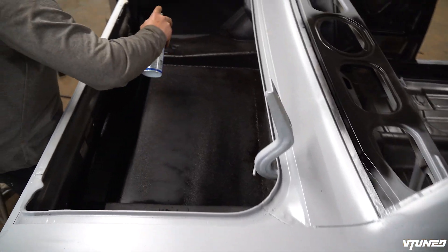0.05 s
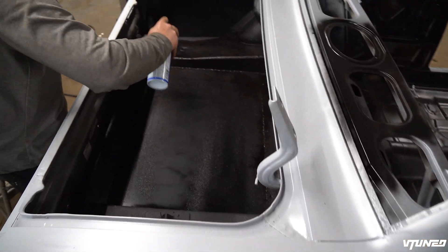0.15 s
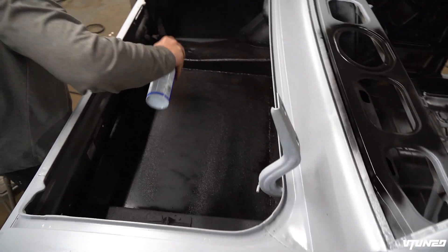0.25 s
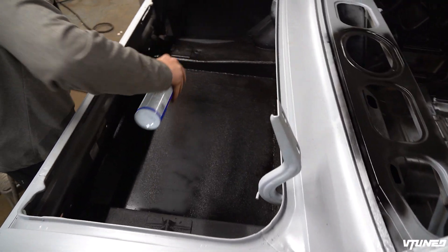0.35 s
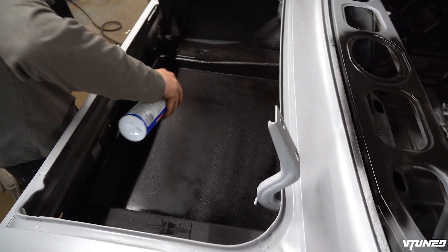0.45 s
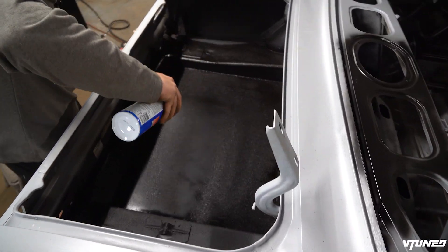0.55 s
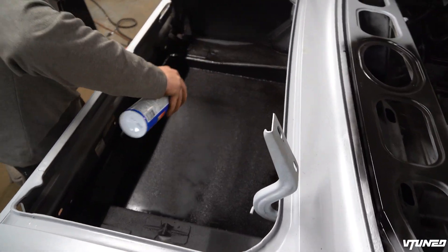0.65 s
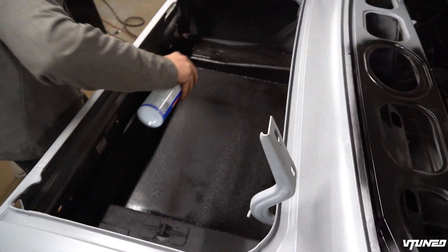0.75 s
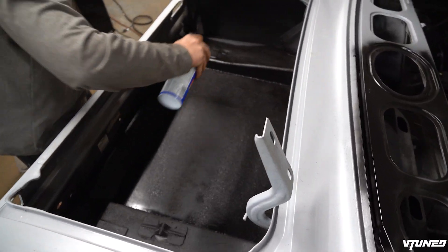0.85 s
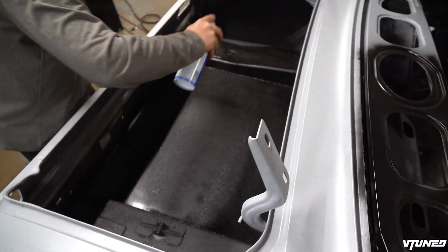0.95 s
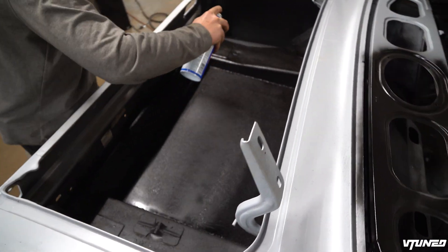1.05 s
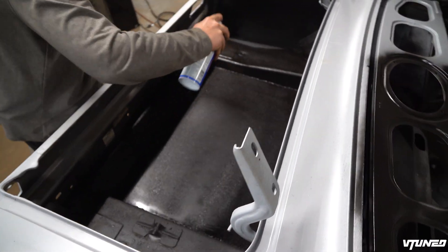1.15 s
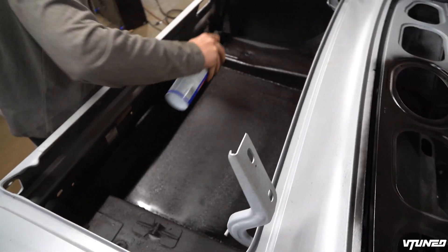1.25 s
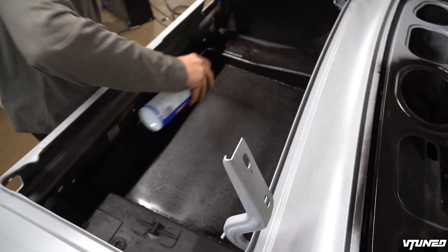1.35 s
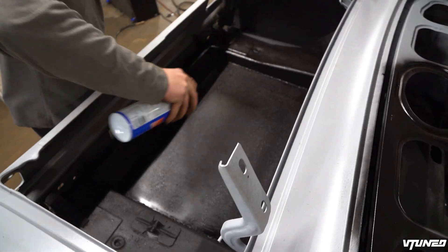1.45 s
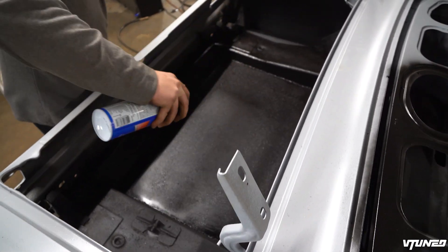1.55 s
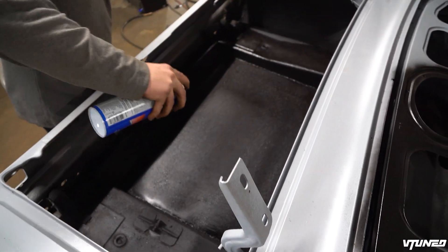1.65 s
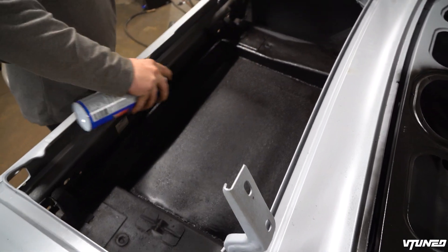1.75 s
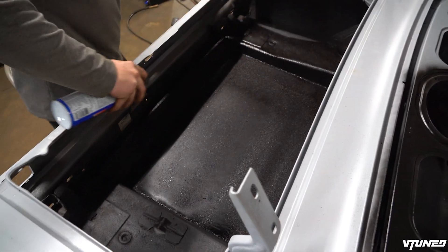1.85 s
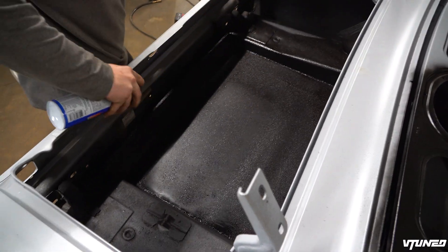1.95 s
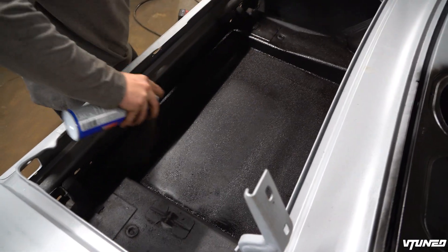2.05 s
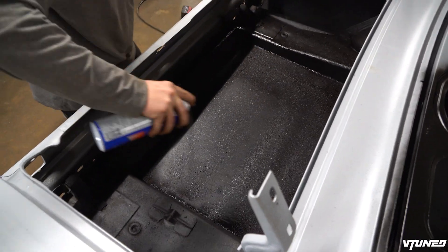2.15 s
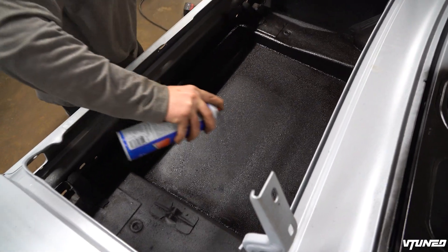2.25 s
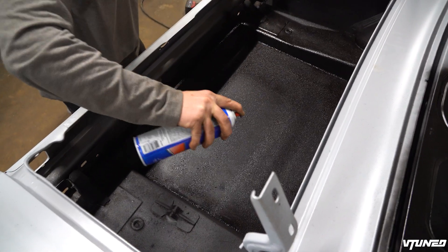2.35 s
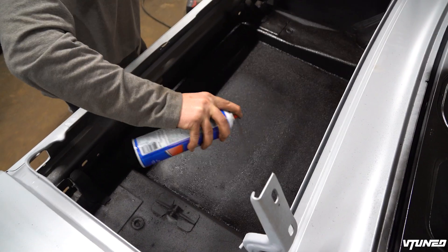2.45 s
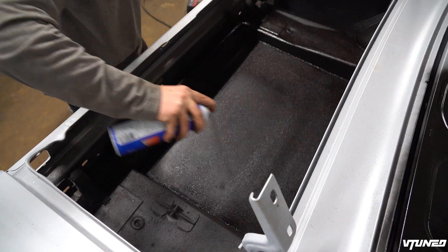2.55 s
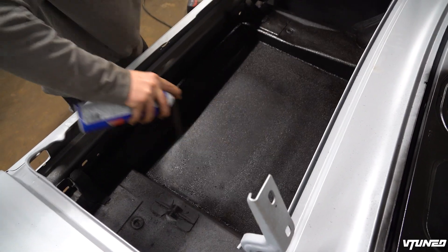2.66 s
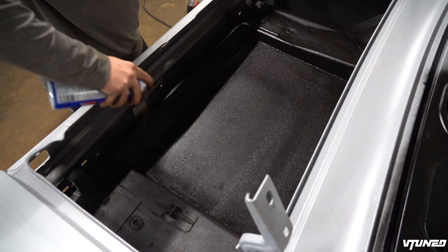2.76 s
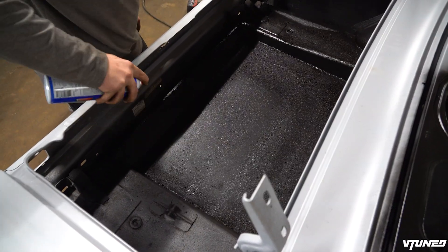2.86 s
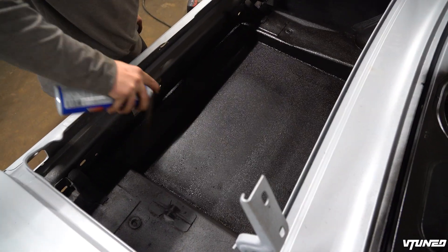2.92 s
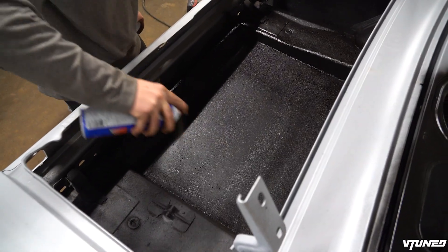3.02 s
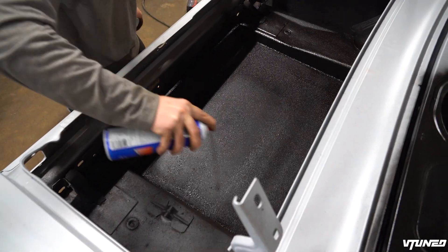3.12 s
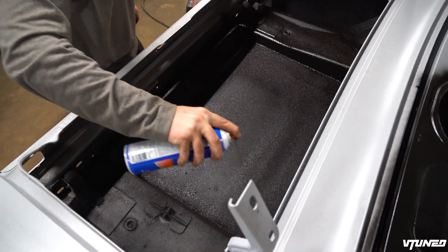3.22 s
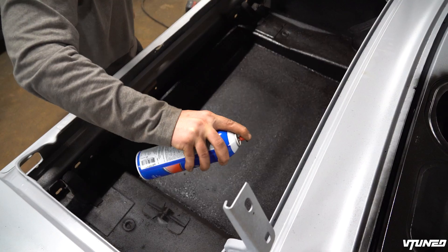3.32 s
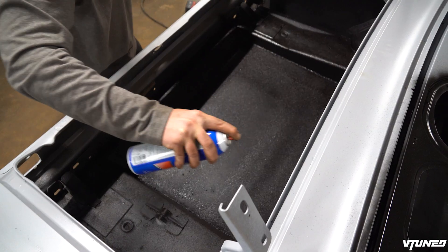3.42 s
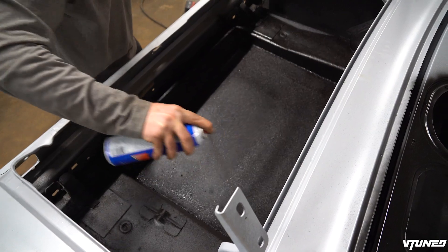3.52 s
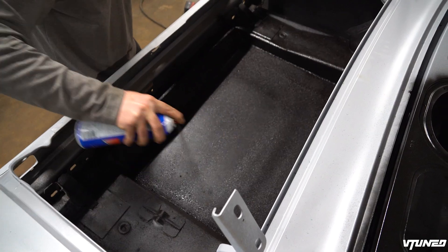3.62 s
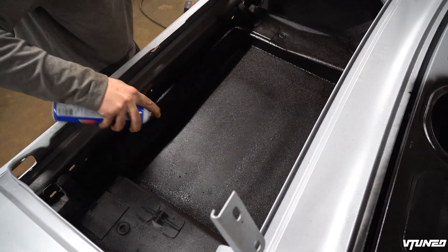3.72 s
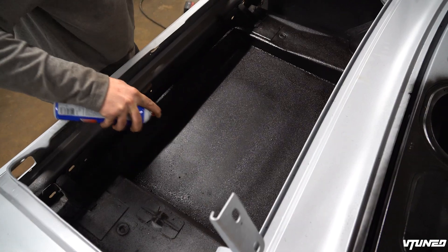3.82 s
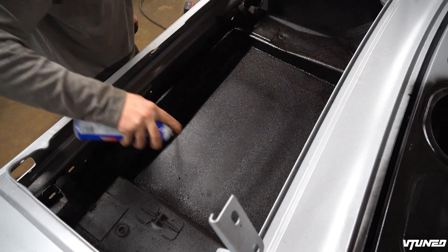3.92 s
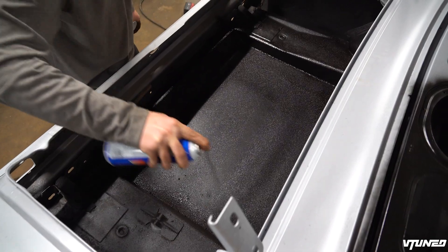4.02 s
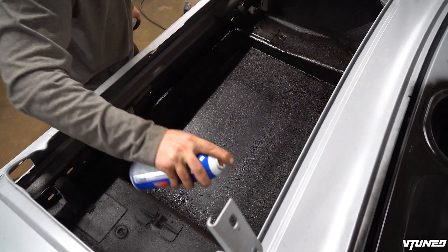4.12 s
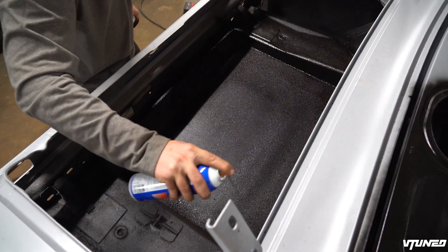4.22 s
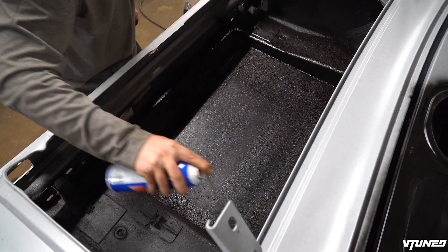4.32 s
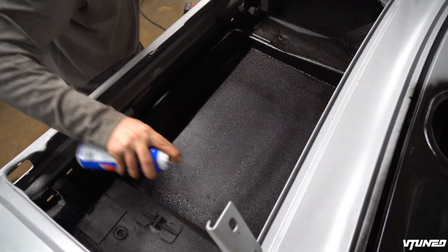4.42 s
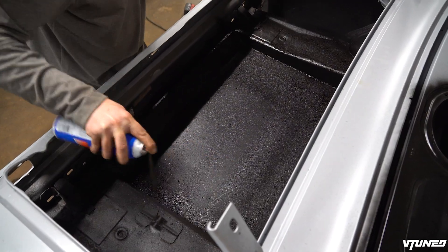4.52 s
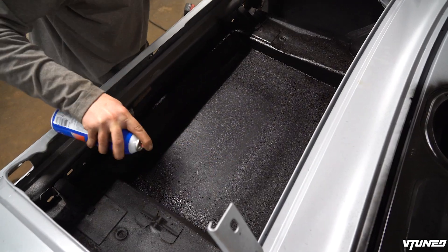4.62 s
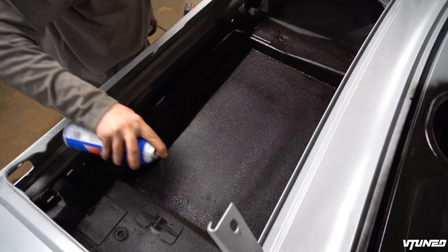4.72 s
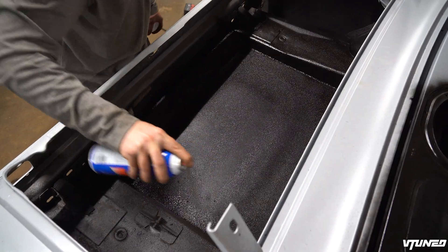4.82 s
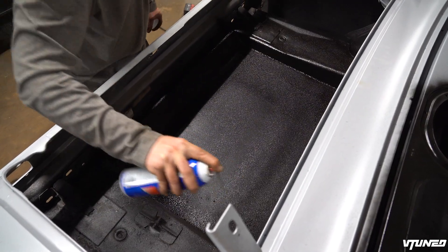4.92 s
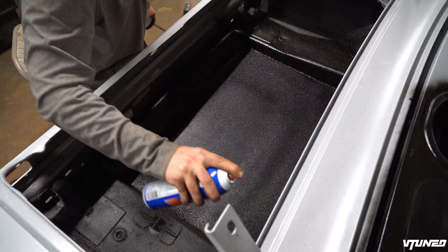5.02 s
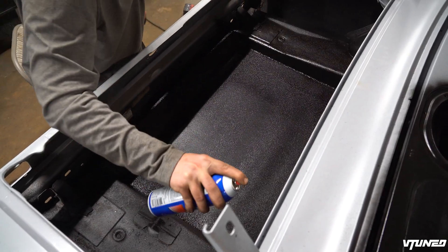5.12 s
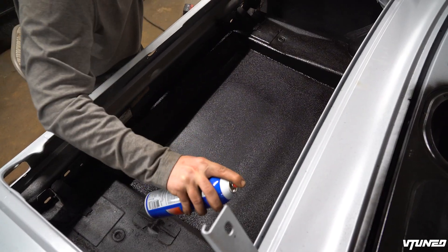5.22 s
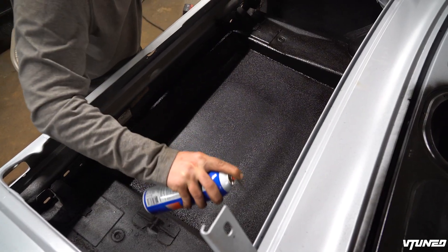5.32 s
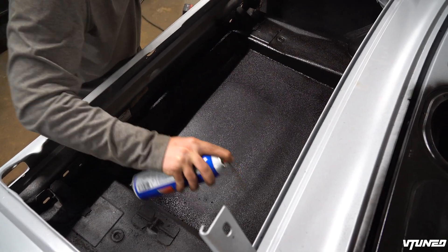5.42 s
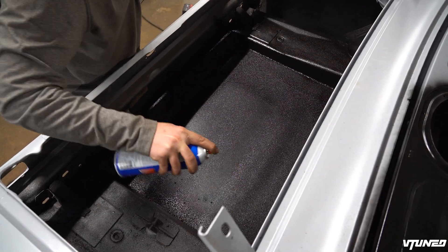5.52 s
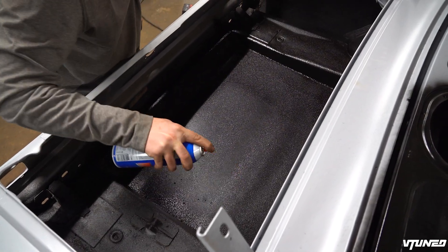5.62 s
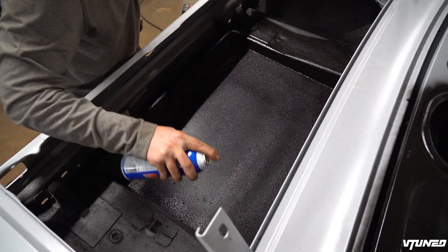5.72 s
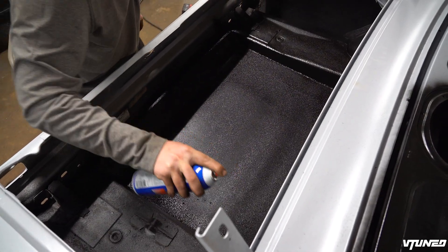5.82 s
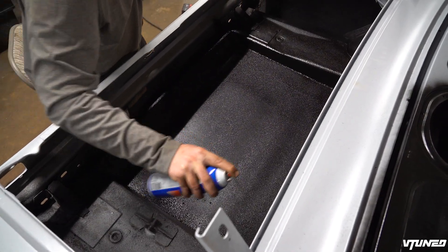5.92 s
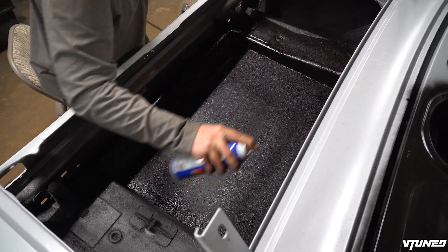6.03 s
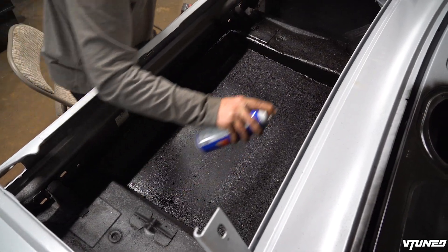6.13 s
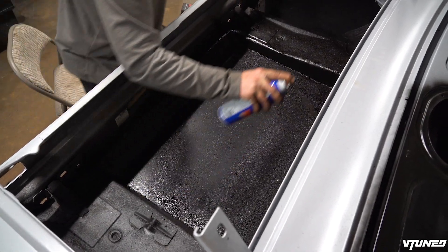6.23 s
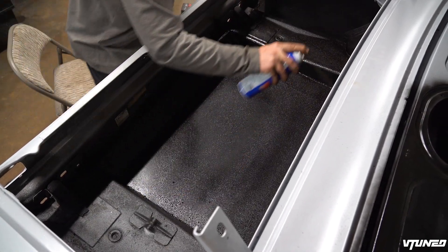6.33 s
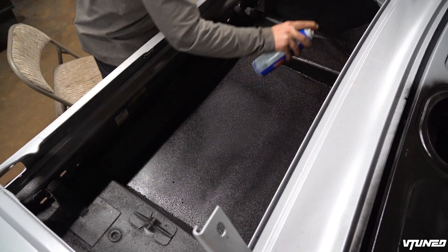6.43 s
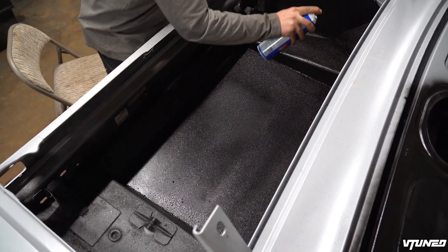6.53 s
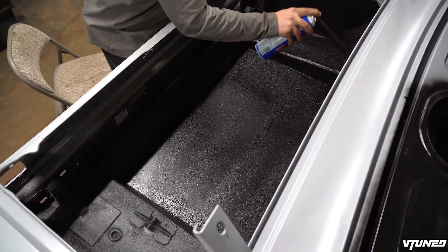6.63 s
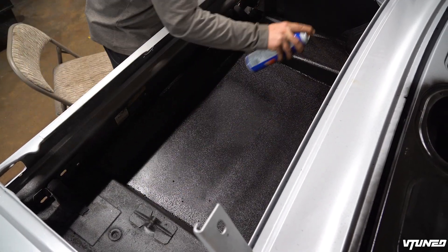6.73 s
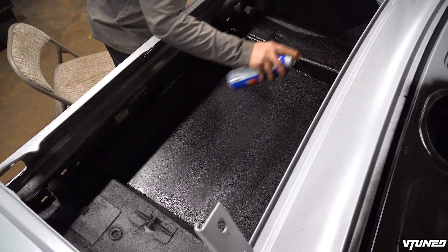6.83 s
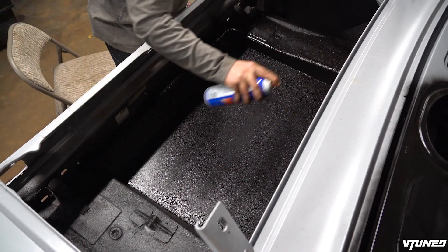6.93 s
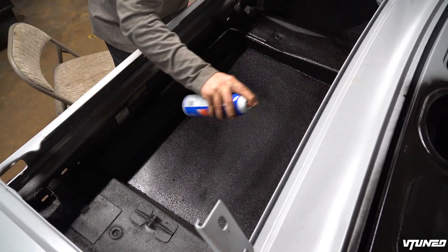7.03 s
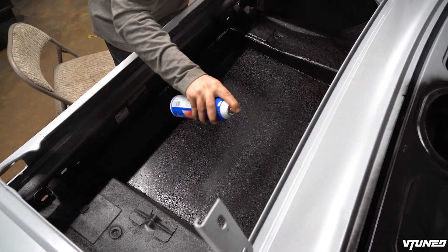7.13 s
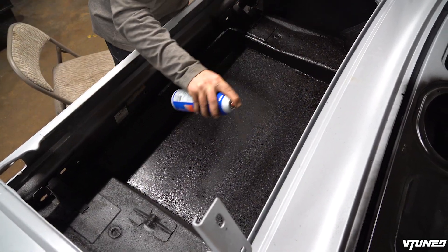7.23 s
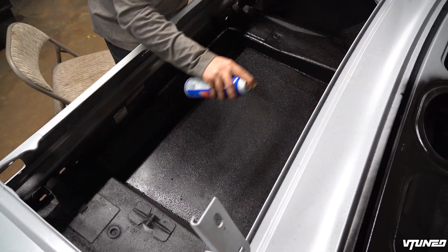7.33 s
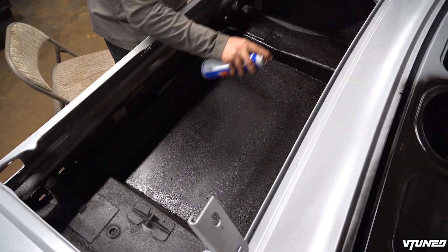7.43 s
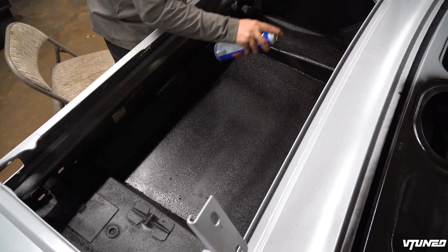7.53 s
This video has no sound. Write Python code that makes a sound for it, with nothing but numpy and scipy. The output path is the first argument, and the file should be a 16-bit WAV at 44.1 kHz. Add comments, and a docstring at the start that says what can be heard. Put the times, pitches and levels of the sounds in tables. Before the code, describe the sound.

An aerosol can sprays paint onto a car's steel trunk floor in repeated short bright hisses, close up, with a garage ringing faintly behind.

```python
"""A spray can lays paint on the steel floor of a car's trunk in short bursts: noise behind a quick valve.
A moving hump colours the hiss as the hand sweeps; the near panel's echo combs it, the trunk well rings.
The can ticks twice between bursts, each a snap and damped modes. The garage rings behind in diffuse echoes,
over still air, low rumble and a faint wavering hum. One microphone, close by, the same on both channels."""
import sys
import numpy as np
from scipy import signal
from scipy.fft import rfft, irfft, next_fast_len
from scipy.io import wavfile
from scipy.ndimage import map_coordinates

SR = 44100
rng = np.random.default_rng(int(sys.argv[2]) if len(sys.argv) > 2 else 0)


def wav_record(signal):
    """Record a signal, one row per channel, as 16-bit PCM in the file named by sys.argv[1]."""
    frames = np.transpose(np.atleast_2d(signal))
    bounded = np.clip(frames, -1, 1)
    # unit amplitude maps onto the largest positive 16-bit level
    quanta = np.round(bounded * 32767).astype(np.int16)
    wavfile.write(sys.argv[1], SR, quanta)


N = 333837
TIME = np.arange(N) / SR  # s

# Spectrum of the nozzle's hiss: (frequency [Hz], relative level [dB])
HISS_SPECTRUM = [(40, -23.5), (300, -21.5), (900, -20.5), (2200, -16), (4400, -10), (5700, -13.5),
                 (7000, -11.5), (8250, -3), (9250, -9.5), (10600, -1), (12600, 0.5), (14000, -6),
                 (15000, -13.5), (15700, -26)]
# One burst for each stroke of the hand: (valve opens [s], valve shuts [s], relative level [dB],
# brightness [dB per octave], hump at the start [Hz], hump at the end [Hz], hump height at best aim [dB],
# best aim [s], time to turn away [s])
STROKES = [ (-.1, 0.091, -26.5, 0, 6950, 6300, 10, 0.018, 0.19),
           (0.178, 0.645, -27.5, 0.1, 5790, 7400, 12.5, 0.28, 0.31),
           (0.75, 1.117, -28, 0.14, 7340, 6260, 13.5, 1.003, 0.19),
           (1.218, 1.647, -27.5, 0.34, 5920, 7600, 13, 1.334, 0.28),
           (2.007, 2.464, -28, 0.3, 4380, 8700, 8, 1.8, 1),
           (2.566, 2.916, -28, 0.26, 7800, 7700, 8, 2.62, 0.21),
           (3.002, 3.43, -27.7, .6, 8300, 7600, 7, 3.32, 0.21),
           (3.555, 3.851, -29, 0.44, 8070, 7450, 8, 3.64, 0.21),
           (3.964, 4.231, -28, 0.36, 7660, 7970, 8.5, 4.21, 0.28),
           (4.339, 4.689, -28.5, 0.3, 8040, 7150, 8.7, 4.45, 0.34),
           (4.856, 5.133, -28.5, 0.32, 7400, 7540, 9, 5.04, 0.33),
           (5.444, 5.664, -27, 0.15, 7840, 7500, 9.5, 5.55, 0.39),
           (6.017, 6.615, -27.5, 0.07, 8300, 6830, 11, 6.35, 0.61),
           (6.729, 7.206, -28.2, 0.2, 7000, 7900, 12.5, 6.88, 0.37),
           (7.305, 7.7, -29.8, 0, 7540, 7740, 8, 7.52, 0.44)]
# The can beside the nearest panel: (time [s], lag of the echo at mid-stroke [ms], echo strength [0-1])
PANEL = [(0, .625, .33), (1.65, .622, .31), (2, .65, .08), (5.7, .82, .08), (6, .822, .24),
         (6.6, .822, .24), (7.57, 1, .08)]
# Ring of the trunk well: (frequency [Hz], time to fall 60 dB [s])
WELL_DECAY = [(200, 0.074), (4000, 0.034), (15000, 0.021)]
# Strength of that ring: (frequency [Hz], level [dB])
WELL_LEVEL = [(200, -14), (1000, -10), (3000, -6.5), (8000, -6.5), (13000, -9)]
# Ring of the garage: (frequency [Hz], time to fall 60 dB [s])
GARAGE_DECAY = [(200, 0.83), (1000, 0.85), (4500, 1), (8000, 0.67), (11000, 0.48), (15000, 0.29)]
# Strength of that ring: (frequency [Hz], level [dB])
GARAGE_LEVEL = [(200, -18.5), (1000, -12), (4500, -9), (6500, -14), (8200, -15), (12000, -16.5),
                (15000, -16)]
# Spectrum of the still air: (frequency [Hz], relative level per Hz [dB])
AIR_SPECTRUM = [(20, -16), (110, -16.5), (250, -13.5), (500, -15), (1500, -16.5), (5000, -13), (15000, -35)]
# Swell of the room's low rumble: (time [s], level [dB])
RUMBLE_SWELL = [(0, -58), (.45, -60.5), (1.2, -68), (2.5, -67.5), (4, -65.5), (5.7, -68.5), (6.2, -58.5),
                (6.7, -64.5), (7.57, -71)]
# Spectrum of the rumble: (frequency [Hz], relative level [dB])
RUMBLE_SPECTRUM = [(20, 1.0), (60, -1), (120, -7.5), (300, -23.5), (900, -58)]
# Hum of distant machinery: (frequency [Hz], level before it wavers [dB])
HUM = [(81, -72.5)]
# Small knocks of the can, before the band-pass: (time [s], snap [dB], ring [dB])
TICKS = [(1.6724, -25, -39.5), (4.7206, -14, -52)]
# Modes of the can: (frequency [Hz], level within the ring [dB], time to fall 60 dB [s])
CAN_MODES = [(1600, -10, .04), (2100, 0, .028), (3450, -2, .02), (4380, -6, .035)]

DIP_SHARE = 0.34  # depth of the dip below the hump, as a share of the hump's height
AWAY_DB = -4.5  # with the nozzle turned right away, the hump becomes a shallow hollow
HUMP_COST = 0.11  # dB that the rest of the hiss loses for each dB of hump
LAG_FOLLOWS = 1.5  # the panel echo's lag shortens as the hump's pitch rises, with this power
TOP_HZ = 15850  # band limit of the camera


def amp(db):
    """Decibels to gain."""
    return 10 ** (np.asarray(db) / 20)


def unit(x):
    """Scale x to rms 1."""
    return x / np.sqrt(np.mean(x ** 2) + 1e-20)


def along(points, hz):
    """Read (frequency, value) points on a log frequency axis."""
    point_hz, values = np.transpose(points)
    return np.interp(np.log(hz + 1), np.log(point_hz + 1), values)


def curves(rows, times):
    """Read each column after the first at the given times."""
    row_times, *columns = np.transpose(rows)
    return [np.interp(times, row_times, column) for column in columns]


def wobble(rate):
    """A smooth random curve through `rate` knots a second."""
    knots = rng.standard_normal(int(N * rate / SR) + 4)
    return map_coordinates(knots, [TIME * rate])


def filtered(x, response):
    """Multiply the spectrum of x by a response of frequency."""
    length = next_fast_len(N + 8192)
    hz = np.fft.rfftfreq(length, 1 / SR)
    return irfft(rfft(x, length) * response(hz), length)[:N]


def noise(spectrum):
    """Noise of rms 1 with the given spectrum."""
    white = rng.standard_normal(N)
    return unit(filtered(white, lambda hz: amp(along(spectrum, hz))))


def sweep(times):
    """In each stroke the hump glides in pitch and swells as the nozzle swings through its best aim.
    Returns level dB, brightness, hump Hz, hump height dB and glide (ratio, 1 at mid-stroke)."""
    rows = np.array(STROKES)
    # one stroke hands over to the next midway through the gap between them
    handovers = (rows[:-1, 1] + rows[1:, 0]) / 2
    current = np.searchsorted(handovers, times)
    on, off, level_db, tilt_db, start_hz, end_hz, height_db, aim_s, turn_s = rows[current].T
    progress = np.clip((times - on) / (off - on), 0, 1)
    glide = (end_hz / start_hz) ** (progress - 0.5)
    hump_hz = np.sqrt(start_hz * end_hz) * glide
    facing = np.exp(-((times - aim_s) / turn_s) ** 2)
    hump_db = AWAY_DB + (height_db - AWAY_DB) * facing
    return level_db - HUMP_COST * hump_db, tilt_db, hump_hz, hump_db, glide


def valve(open_s, shut_s):
    """Flow from 0 to 1: the finger opens the valve quickly, its spring shuts it a little more slowly."""
    travel = np.zeros(N)
    for on, off, *_ in STROKES:
        opening = np.clip((TIME - on) / open_s, 0, 1)
        shutting = np.clip((off - TIME) / shut_s, 0, 1)
        travel += opening * shutting
    return np.sin(np.pi / 2 * travel) ** 2


def jet(hump_octaves, flutter_db, sputter_db):
    """Turbulent hiss of the nozzle, with a broad hump and a dip below it that move as the can turns."""
    hz, frame_times, frames = signal.stft(noise(HISS_SPECTRUM), SR, nperseg=512)
    level_db, tilt_db, hump_hz, hump_db, _ = sweep(frame_times)
    octave = np.log2(np.maximum(hz, 300))[:, None]
    offset = (octave - np.log2(hump_hz)) / hump_octaves  # distance from the hump, in hump widths
    dip = DIP_SHARE * np.exp(-2 * (offset + 2) ** 2)
    hump = np.exp(-0.5 * offset ** 2) - dip
    above_pivot = octave - np.log2(8192)  # brightness tilts about 8192 Hz
    colour = amp(level_db + hump_db * hump + tilt_db * above_pivot)
    hiss = signal.istft(frames * colour, SR, nperseg=512)[1][:N]
    # paint and gas leave the nozzle in an uneven mix
    uneven = amp(flutter_db * wobble(45) + sputter_db * wobble(700))
    return hiss * uneven * valve(open_s=0.011, shut_s=0.033)


def echoes(x, decay, level, gap_s, size):
    """Diffuse echoes, `size` samples long, each frequency dying at its own speed.
    Overlapping slices of sound get fresh random patterns, as the can moves."""
    step = SR // 6
    out = np.zeros(N + 2 * size)
    for start in range(-step, N, step):
        span = np.arange(max(start, 0), min(start + 2 * step, N))
        piece = x[span] * np.sin(np.pi * (span - start) / (2 * step))
        hz, t, frames = signal.stft(rng.standard_normal(size), SR, nperseg=128)
        build_up = np.clip(t / gap_s, 0, 1)
        fade = amp(-60 * t / along(decay, hz)[:, None]) * build_up
        # even out the energy, so that the level table alone sets each frequency's strength
        fade /= np.sqrt(size * np.mean(fade ** 2, axis=1, keepdims=True))
        strength = amp(along(level, hz))[:, None]
        tail = signal.istft(frames * fade * strength, SR, nperseg=128)[1]
        answer = signal.fftconvolve(piece, tail)
        out[span[0]:][:len(answer)] += answer
    return out[:N]


def trunk(x, corner_hz):
    """The nearest steel panel throws back the treble with a lag that slides with the hand: a gliding comb."""
    mid_lag_ms, strength = curves(PANEL, TIME)
    *_, glide = sweep(TIME)
    lag_ms = mid_lag_ms / glide ** LAG_FOLLOWS
    treble = filtered(x, lambda hz: hz ** 4 / (hz ** 4 + corner_hz ** 4))
    echo = map_coordinates(treble, [np.arange(N) - lag_ms * SR / 1000], order=5)
    return (x - strength * echo) / np.sqrt(1 + strength ** 2)


def room_tone(air_db, rumble_db, waver_db):
    """Still air, a slowly swelling rumble and a hum of distant machinery that wavers in phase and level."""
    air = amp(air_db) * noise(AIR_SPECTRUM)
    swell_db, = curves(RUMBLE_SWELL, TIME)
    rumble = amp(rumble_db + swell_db) * noise(RUMBLE_SPECTRUM)
    hum = np.zeros(N)
    for hz, level_db in HUM:
        phase = 2 * np.pi * hz * TIME + 0.48 * wobble(5.5)
        hum += amp(level_db) * np.sqrt(2) * np.sin(phase)
    return air + rumble + hum * amp(waver_db * wobble(5))


def ticks():
    """Each knock is a single-sample snap and a well-damped ring of the can's modes, then band-passed."""
    out = np.zeros(N)
    t = np.arange(SR // 4) / SR
    for tick_s, snap_db, ring_db in TICKS:
        knock = np.zeros(len(t))
        for hz, mode_db, t60 in CAN_MODES:
            knock += amp(ring_db + mode_db - 60 * t / t60) * np.sin(2 * np.pi * hz * t)
        knock[0] += amp(snap_db)
        out[round(tick_s * SR):][:len(t)] += knock
    band = signal.butter(3, [1350, 4600], 'band', fs=SR, output='sos')
    return signal.sosfilt(band, out)


def scene():
    """Spray and can in the trunk well and the garage, the same on both channels."""
    spray = amp(-1.0) * jet(hump_octaves=0.26, flutter_db=1.0, sputter_db=-0.12)
    can = spray + ticks()
    well = echoes(can, WELL_DECAY, WELL_LEVEL, gap_s=0.001, size=SR // 8)
    garage = echoes(can, GARAGE_DECAY, GARAGE_LEVEL, gap_s=0.0064, size=SR)
    close = trunk(can + well, corner_hz=4600)
    mono = close + garage + room_tone(air_db=-69.0, rumble_db=0.0, waver_db=1.5)
    return np.array([mono, mono])


def record(dry):
    """The camera keeps nothing above its band limit."""
    return np.array([filtered(channel, lambda hz: hz < TOP_HZ) for channel in dry])


dry = scene()
out = record(dry)
wav_record(out)
```